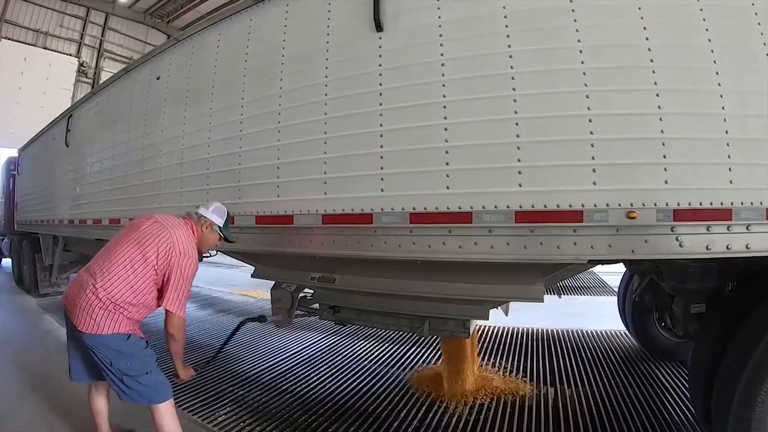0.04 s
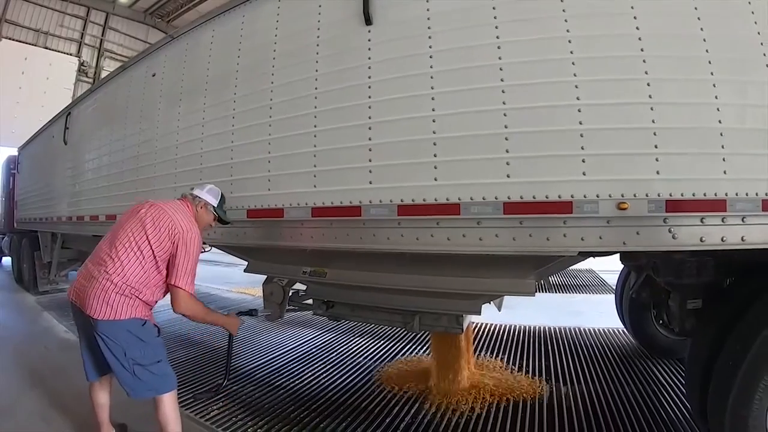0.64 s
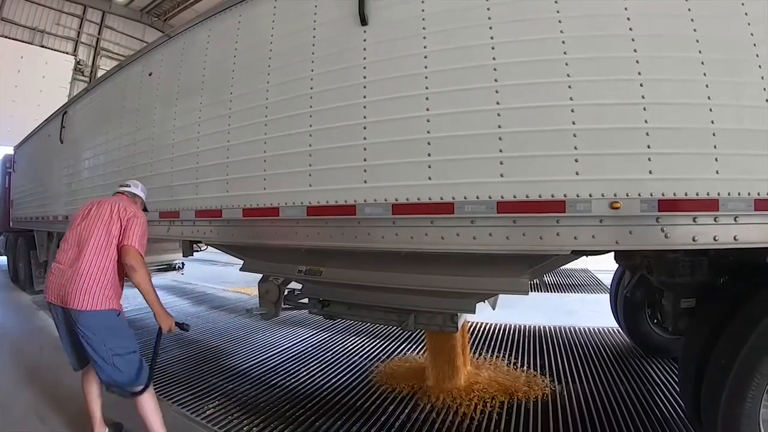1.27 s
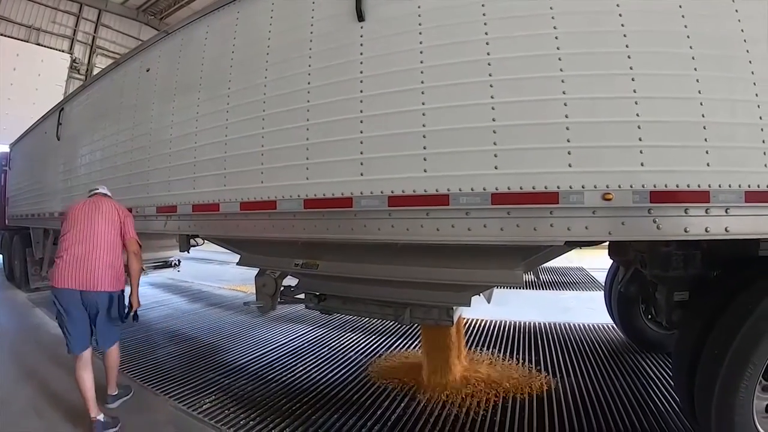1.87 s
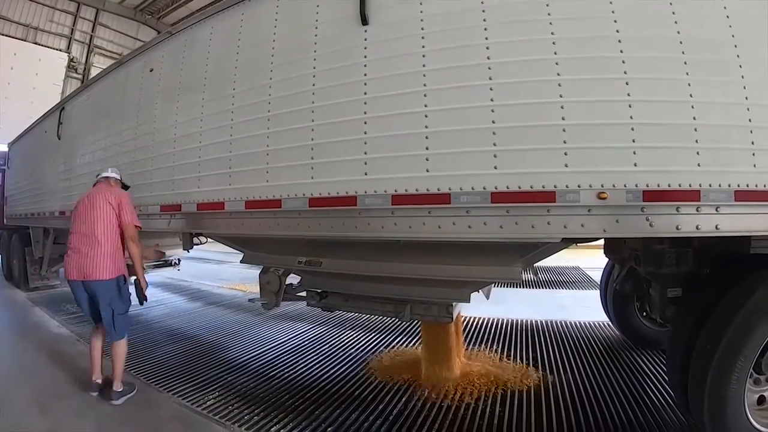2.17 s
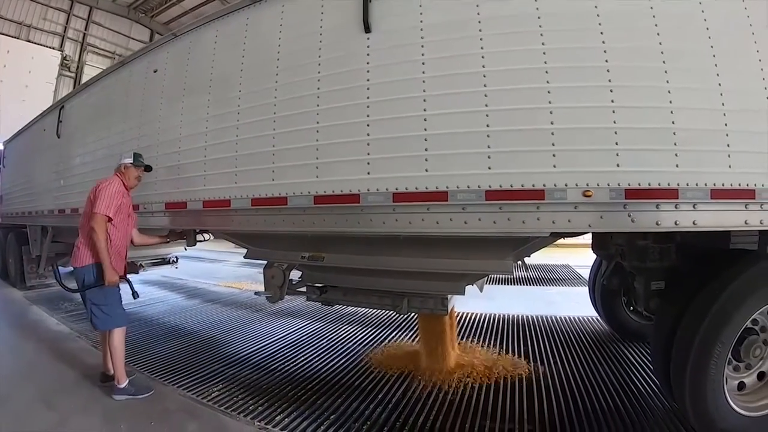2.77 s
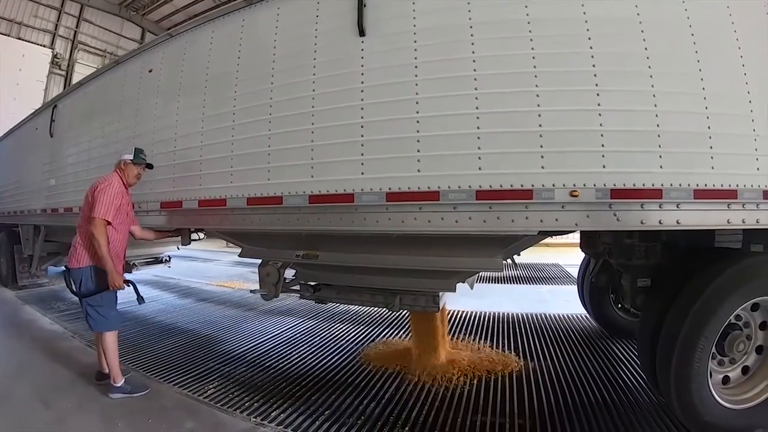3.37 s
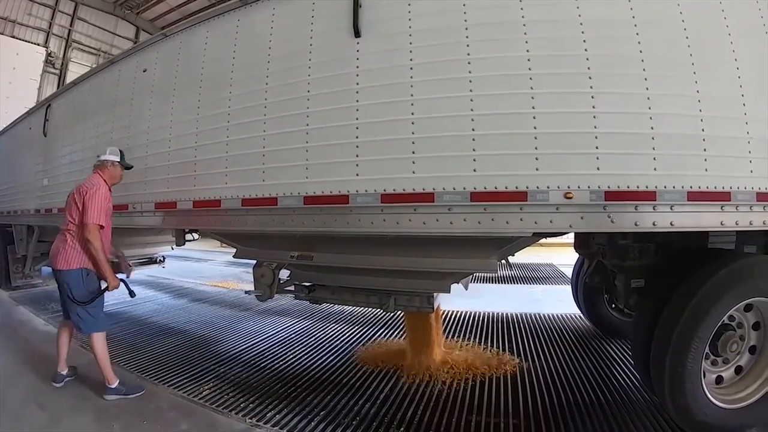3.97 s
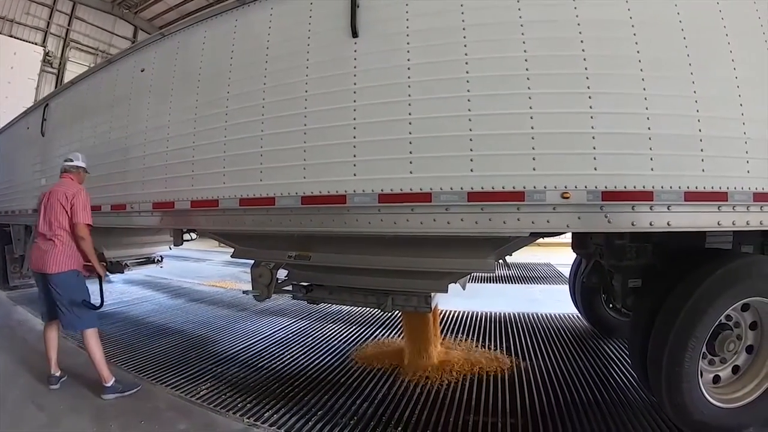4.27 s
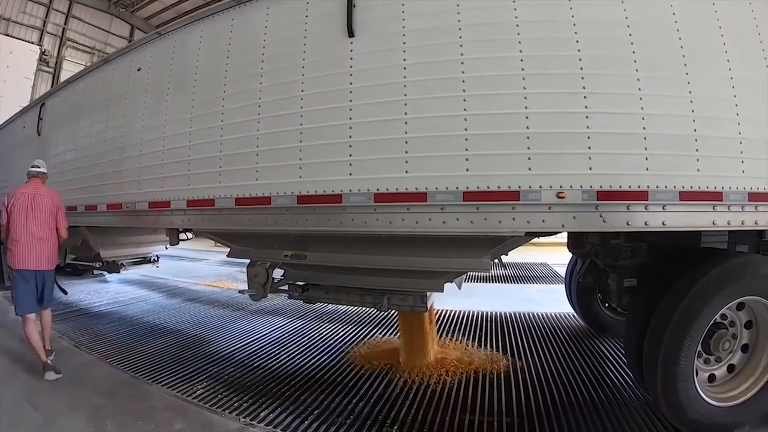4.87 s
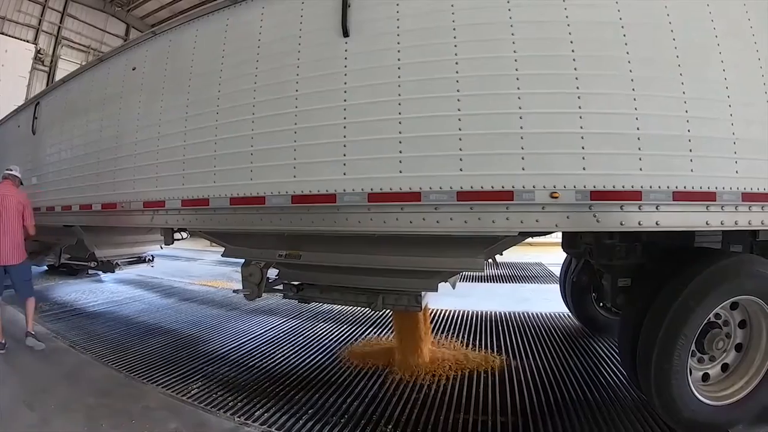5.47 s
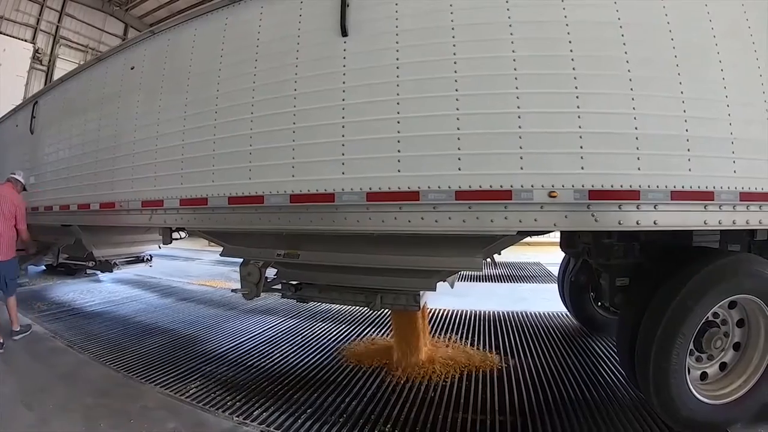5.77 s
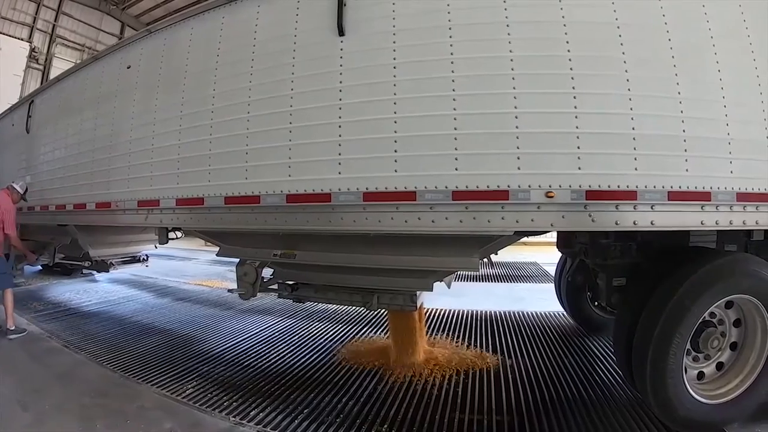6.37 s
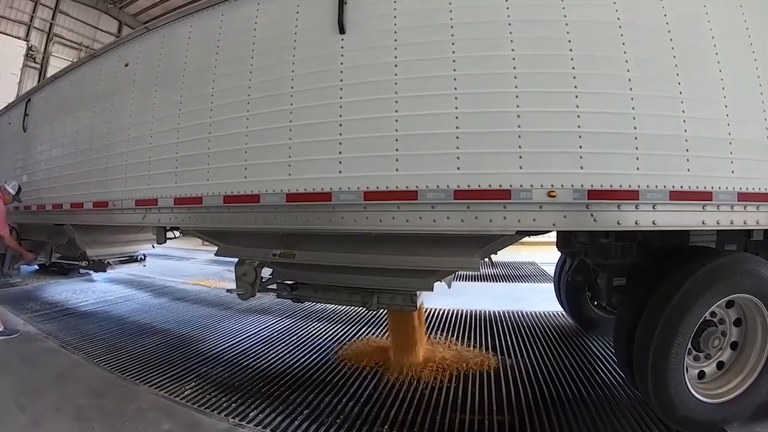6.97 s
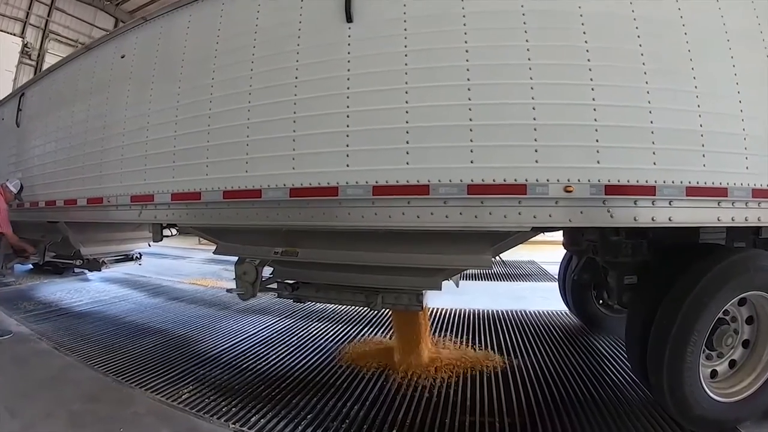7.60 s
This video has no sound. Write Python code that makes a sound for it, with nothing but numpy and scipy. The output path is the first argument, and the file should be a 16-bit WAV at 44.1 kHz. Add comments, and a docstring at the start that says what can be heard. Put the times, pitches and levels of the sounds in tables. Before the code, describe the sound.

Shelled corn pours steadily from a trailer through a steel grate, a loud rushing hiss over low rumble and motor hum.

```python
"""Shelled corn pours steadily from a trailer's hopper gate through a steel grate into a pit, in a metal shed.
Countless kernel impacts on the bars and on each other add incoherently to a hiss whose treble dulls as
the heap spreads. The gate rustles, pit and hopper resonate with a low rumble, and two motors hum at
nearly one frequency and beat. A mono camera a few metres away holds the bass down with a limiter."""
import sys
import numpy as np
from scipy import signal
from scipy.fft import rfft, irfft
from scipy.io import wavfile
from scipy.ndimage import uniform_filter1d

SR = 44100
rng = np.random.default_rng(int(sys.argv[2]) if len(sys.argv) > 2 else 0)


def to_wav(sig):
    """Store sig (one row per channel, or 1-D mono) as 16-bit WAV at the path in sys.argv[1].

    Samples outside -1..1 are clipped; the rate is SR.
    """
    pcm = np.clip(np.atleast_2d(sig), -1, 1) * 32767
    pcm = np.round(pcm).astype(np.int16)
    wavfile.write(sys.argv[1], SR, pcm.T)  # frames by channels


N = 341334


def undb(db):
    """Decibel law: amplitude grows tenfold per 20 dB."""
    return 10 ** (np.asarray(db) / 20)


def unit(x):
    """Normalisation to rms 1."""
    return x / np.sqrt(np.mean(x ** 2))


def colour(x, spectrum):
    """Spectral shaping by (f/Hz, level/dB) points joined on a log-frequency axis; rms 1."""
    hz, db = np.transpose(spectrum)
    bin_hz = np.maximum(np.arange(N // 2 + 1) * SR / N, 1)
    gain = undb(np.interp(np.log(bin_hz), np.log(hz), db))
    return unit(irfft(rfft(x) * gain, N))


def split(x, edge_hz):
    """Complementary crossover: the low-passed part and the remainder."""
    low = signal.sosfiltfilt(signal.butter(4, edge_hz, fs=SR, output="sos"), x)
    return low, x - low


def flutter(rate_hz):
    """Random modulation: values drawn at rate_hz, held and smoothed twice; rms 1."""
    hold = int(SR / rate_hz)
    steps = np.repeat(rng.standard_normal(N // hold + 1), hold)
    return unit(uniform_filter1d(uniform_filter1d(steps, hold), hold)[:N])


def impacts(per_s, spread_db):
    """Shot noise: independent blows at random moments, many soft and a few hard."""
    chance, hardness, push = rng.random(N), rng.exponential(size=N), rng.standard_normal(N)
    strikes = (chance < per_s / SR) * np.sign(push)
    return unit(strikes * undb(spread_db * np.minimum(hardness, 6)))


def shed(x, t60_s, wet_db):
    """Diffuse reverberation: blows land all over the heap, so only their energy lingers, as noise."""
    retained = np.exp(-2 * np.log(1000) / (t60_s * SR))
    # the pour is long under way, so the tail is already built up
    energy, _ = signal.lfilter([1 - retained], [1, -retained], x ** 2, zi=[retained * np.mean(x ** 2)])
    tail = np.sqrt(energy) * rng.standard_normal(N)
    return unit(x + undb(wet_db) * tail)


def steel(low_hz, high_hz, t60_s, spread_db, blows, modes):
    """Damped modal vibration: each random blow rings one mode of steel deadened by corn; rms 1."""
    mode_hz = low_hz + (high_hz - low_hz) * rng.random(modes)
    length = SR // 5
    t = np.arange(length) / SR
    rings = np.sin(2 * np.pi * mode_hz[:, None] * t) * np.exp(-np.log(1000) * t / t60_s)
    out = np.zeros(N + 2 * length)
    for when, which, chance in rng.random((blows, 3)):
        start = int(when * (N + length))
        hardness = -np.log(max(chance, 0.02))  # hard blows are rare
        out[start:start + length] += rings[int(which * modes)] * undb(spread_db * hardness)
    return unit(out[length:length + N])


# spectrum of kernels striking steel and each other: f/Hz, relative level/dB
KERNEL_SPECTRUM = [(680, -65), (1150, -16.5), (1250, -5.5), (1330, -4), (1720, -5), (2030, -2),
                   (2490, -2.5), (3140, -0.5), (4450, -0.5), (6510, -4.5), (8190, -10), (9030, -9),
                   (11000, -18), (12500, -10), (15600, -31)]
# envelope of the hiss of flowing corn: t/s, relative level/dB
FLOW_ENVELOPE = [(0.0, -19), (0.82, -19), (6.03, -19), (7.74, -20)]


def kernels(t):
    """Incoherent summation: ticks and ringing bars merge into hiss; hits on bare steel are brighter."""
    ticks = shed(impacts(per_s=22000, spread_db=2.05), t60_s=0.43, wet_db=-1)
    bars = steel(low_hz=1199.6, high_hz=15006, t60_s=0.1, spread_db=1.7, blows=9000, modes=700)
    hail = colour(ticks + undb(-8) * bars, KERNEL_SPECTRUM)
    body, top = split(hail, edge_hz=5860)
    on_corn, on_steel = split(body, edge_hz=4600)
    treble, sizzle = split(unit(top), edge_hz=11300)
    steel_db_per_s, treble_db_per_s = 0.32, -0.28  # drift as the heap spreads
    on_corn = on_corn * undb(0.4 * flutter(rate_hz=14))
    on_steel = on_steel * undb(-0.5 + steel_db_per_s * t + 0.39 * flutter(rate_hz=16))
    top = treble * undb(-8 + treble_db_per_s * t) + sizzle * undb(-9)
    top = top * undb(0.4 * flutter(rate_hz=24)) * dips(t)
    flow_db = np.interp(t, *np.transpose(FLOW_ENVELOPE)) - 0.08
    return (unit(on_corn + on_steel) + top) * undb(flow_db)


# spectrum of corn sliding through the sheet-metal gate: f/Hz, relative level/dB
GATE_SPECTRUM = [(330, -48), (560, -20), (627, -9), (717, -3), (848, -0.5), (949, 0.5), (1120, -16),
                 (1460, -53), (2460, -120)]


def gate(t):
    """Plate vibration: kernels jostle through the gate in spurts, so its sheet metal rustles and rings."""
    jostle = shed(impacts(per_s=4000, spread_db=3), t60_s=0.4, wet_db=-2)
    sheet = steel(low_hz=600.4, high_hz=1080, t60_s=0.13, spread_db=1.5, blows=500, modes=40)
    rustle = unit(colour(jostle, GATE_SPECTRUM) + undb(-3) * colour(sheet, GATE_SPECTRUM))
    return rustle * undb(-37.9 + 0.87 * flutter(rate_hz=12)) * dips(t) ** 0.8


# response of the hollow of pit and hopper: f/Hz, relative level/dB
CAVITY_SPECTRUM = [(20, -31), (50, -28.5), (85, -21.5), (103, -3.5), (142, 1), (185, -1.5), (240, -4.5),
                   (265, -10), (312, -8), (345, -17.5), (400, -19.5), (495, -26.5), (570, -44), (800, -75)]


def pit(t):
    """Cavity resonance: clumps of corn thud into the pit and boom on the hopper walls."""
    thuds = shed(impacts(per_s=2500, spread_db=2), t60_s=0.38, wet_db=-3.5)
    walls = steel(low_hz=134.2, high_hz=401.5, t60_s=0.18, spread_db=2, blows=220, modes=24)
    boom = unit(colour(thuds, CAVITY_SPECTRUM) + undb(-9) * colour(walls, CAVITY_SPECTRUM))
    deep, hollow = split(boom, edge_hz=70)
    deep_db = 1.8 - 0.55 * t + 2.6 * flutter(rate_hz=9.7)  # surges, and eases slowly
    return (deep * undb(deep_db) + hollow) * undb(-20.1)


# overtones of each motor: harmonic number, level/dB re the fundamental
MOTOR_HARMONICS = [(2, -14.5), (3, -23)]


def hum(cycles, level_db):
    """Harmonic series: one motor's tone and weak overtones, wavering in frequency and level."""
    waver_hz = 0.1 * flutter(rate_hz=14)
    phase = 2 * np.pi * (cycles + np.cumsum(waver_hz - waver_hz.mean()) / SR)
    overtones = sum(undb(db) * np.sin(round(k) * phase) for k, db in MOTOR_HARMONICS)
    return np.sqrt(2) * (np.sin(phase) + overtones) * undb(level_db + 1.4 * flutter(rate_hz=5))


def motors(t):
    """Beats: two hums swell at their difference frequency; the slower motor fades, the faster speeds up."""
    hum_hz, beat_hz, in_phase_s = 119.3, 3.05, 0.14
    speed_up_hz, speed_up_s = 0.7, 4.4
    fade_db_per_s, fade_start_s = 8, 3.5
    cycles = hum_hz * t
    lead_cycles = beat_hz * (t - in_phase_s) + speed_up_hz * np.maximum(t - speed_up_s, 0)
    fade_db = fade_db_per_s * np.maximum(t - fade_start_s, 0)
    return hum(cycles, level_db=-25.7 - fade_db) + hum(cycles + lead_cycles, level_db=-30)


# brief dips in the top of the hiss and, more weakly, the gate's rustle: t/s, level/dB
LEVEL_DIPS = [(1.560, -8), (2.318, -7), (2.972, -12), (3.512, -6), (5.206, -7), (5.68, -5), (6.648, -7),
              (6.724, -20), (7.308, -6)]


def dips(t):
    """Amplitude modulation: a gain with brief flat-bottomed dips, the deeper ones lasting longer."""
    gain_db = 0
    for centre_s, depth_db in LEVEL_DIPS:
        half_width_s = 0.006 + 0.0005 * abs(depth_db)
        gain_db += depth_db * np.exp(-((t - centre_s) / half_width_s) ** 4)
    return undb(gain_db)


def scene():
    """Superposition: all sources add at one microphone, the same on both channels."""
    t = np.arange(N) / SR
    return np.tile(kernels(t) + gate(t) + pit(t) + motors(t), (2, 1))


def limit(x, ceiling_db, window_s):
    """Soft limiting: the gain falls as the short-term power nears the ceiling."""
    size = max(int(window_s * SR), 1)
    power = uniform_filter1d(uniform_filter1d(x ** 2, size), size)
    return x / (1 + (power / undb(ceiling_db) ** 2) ** 2) ** 0.25


def record(dry):
    """Dynamic compression: the camera limits the bass, rounds the highest peaks, then cuts the top."""
    bass, rest = split(dry, edge_hz=530)
    held = limit(bass, ceiling_db=-18, window_s=0.011) + rest
    held = limit(held, ceiling_db=-3.5, window_s=0.0011)
    cutoff_hz = 15600
    return signal.sosfilt(signal.ellip(10, 0.1, 80, cutoff_hz, fs=SR, output="sos"), held)


dry = scene()
out = record(dry)
to_wav(out)
```